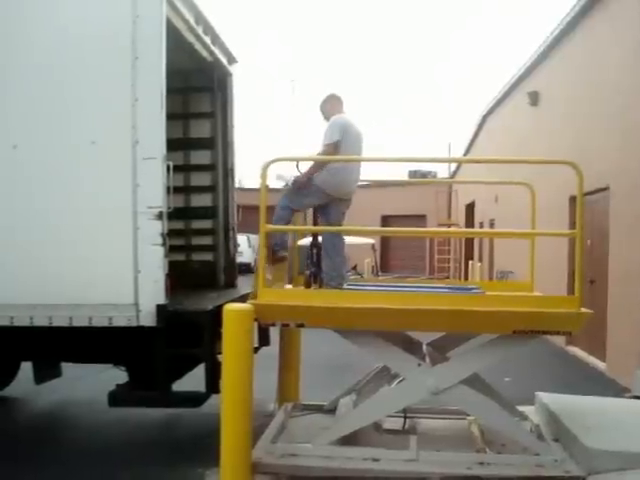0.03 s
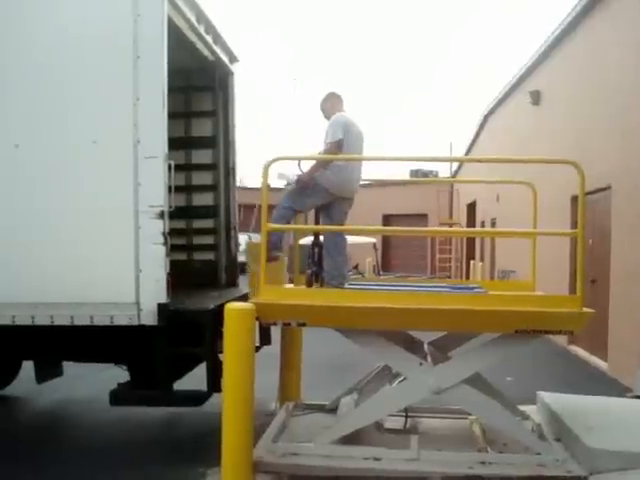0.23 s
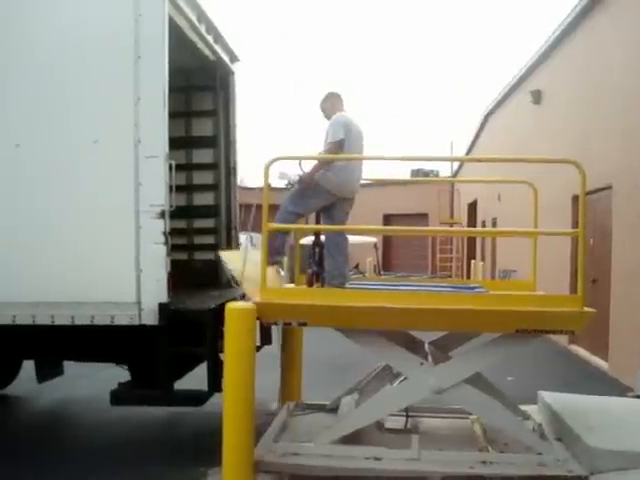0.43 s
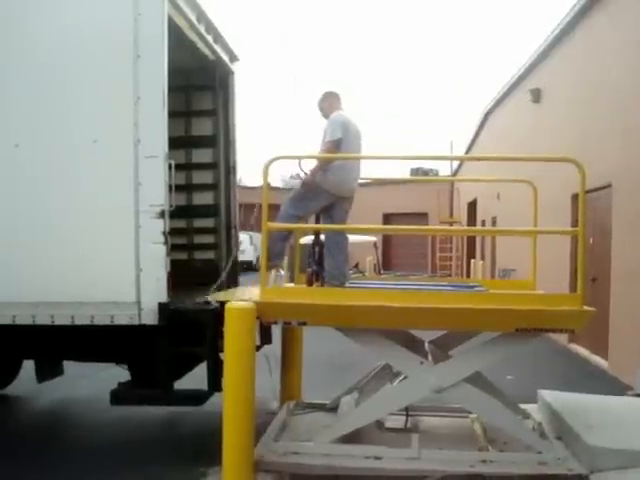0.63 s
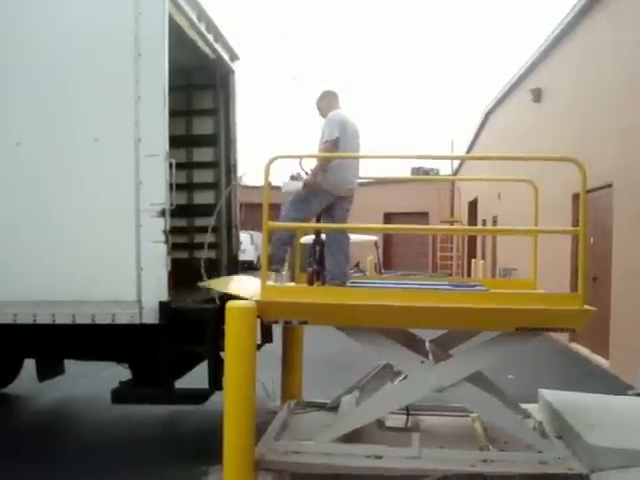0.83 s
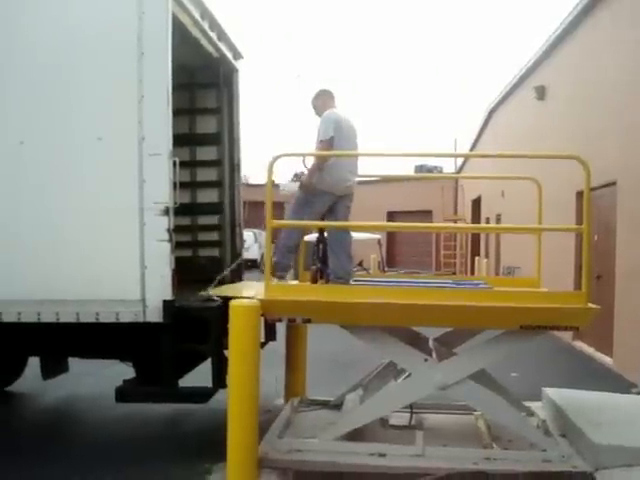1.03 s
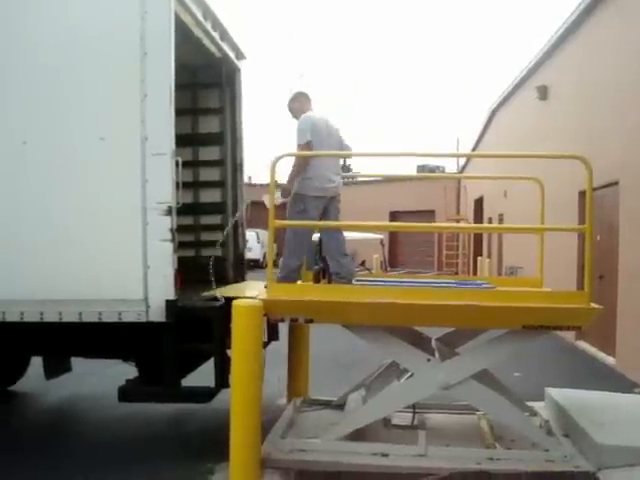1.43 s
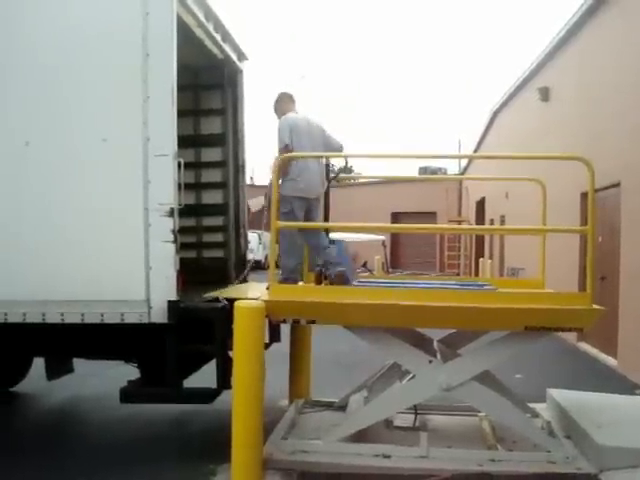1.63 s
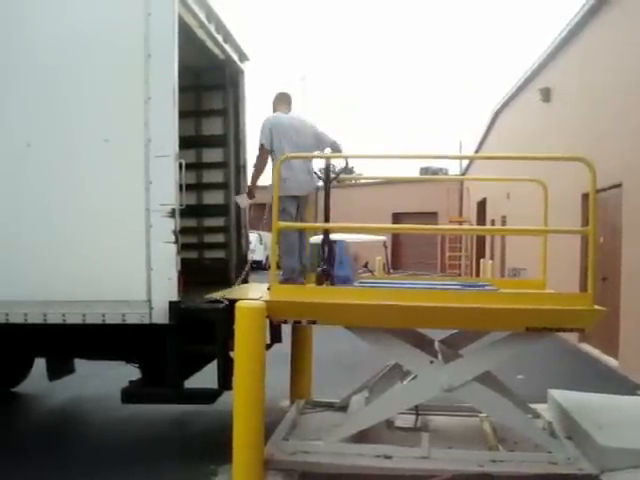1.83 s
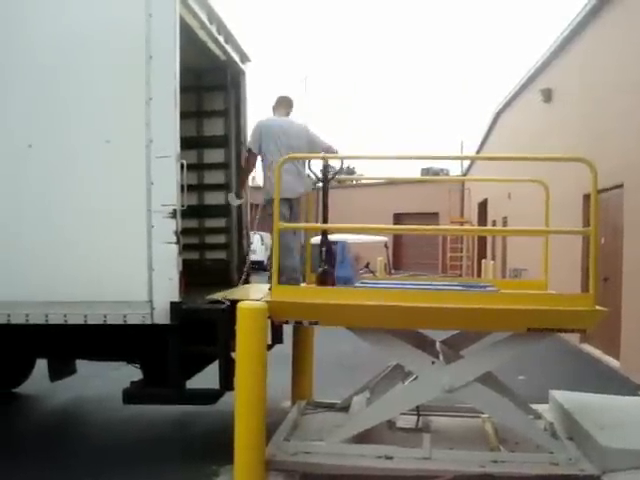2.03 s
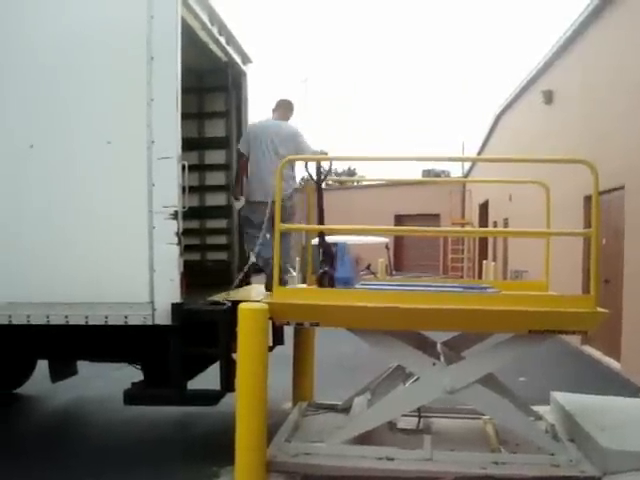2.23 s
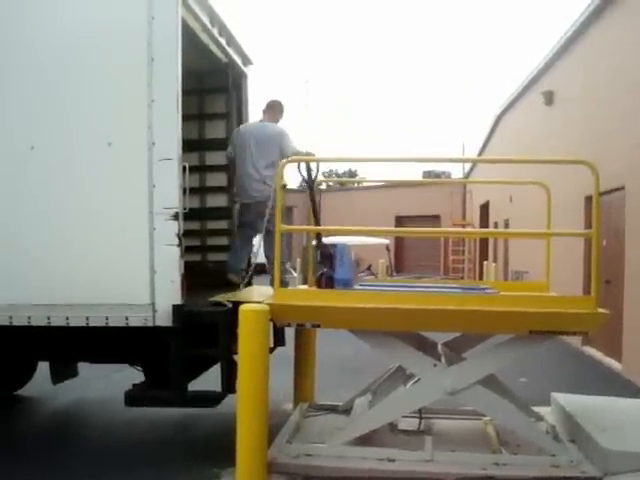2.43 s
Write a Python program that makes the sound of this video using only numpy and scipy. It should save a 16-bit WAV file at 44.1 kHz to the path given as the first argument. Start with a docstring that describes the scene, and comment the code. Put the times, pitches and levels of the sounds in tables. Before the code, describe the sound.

A heavy metal plate squeaks on its hinge, clangs down and rattles under boots.

```python
"""A loading yard outdoors, on a small camera microphone within earshot of a steel dock plate.
Over a steady distant roar comes one knock; the plate swings down on a dry hinge that squeaks, groans and
scrapes. At 0.8 s it crashes onto a truck bed and bounces; the camera's gain, a drawn curve, ducks the
roar. A soft, long rattle lingers, and from about 1.75 s boots and a pallet jack knock on the loose plate
while the gain slowly recovers. The truck box and the yard walls ring behind it all."""
import sys
import numpy as np
from scipy import signal
from scipy.fft import rfft, irfft
from scipy.io import wavfile

SR = 44100
rng = np.random.default_rng(int(sys.argv[2]) if len(sys.argv) > 2 else 0)


def to_wav(s):
    """Save 16-bit WAV."""
    ch = np.atleast_2d(s).T  # columns
    pcm = np.round(np.clip(ch, -1, 1) * 32767)  # PCM
    wavfile.write(sys.argv[1], SR, pcm.astype(np.int16))


N = 114660

# spectrum of the distant roar: f/Hz, level/dB
ROAR_COLOUR = [(25, -42.5), (241, -9.5), (604, -4), (829, -0.5), (1170, -11.5), (1800, -22.5), (3430, -39),
               (8410, -51), (9840, -48), (10700, -92)]
# the steady roar as the camera's automatic gain ducks it and slowly recovers: t/s, level/dB
DUCKED_LEVEL = [(0, -30), (.35, -26.5), (.8, -33), (1.4, -36.5), (1.75, -41.5), (2.2, -39.5), (2.6, -34)]
# echoes of truck box and walls: f/Hz, T60/s
YARD_T60 = [(200, 1.1), (1200, 1.04), (9000, 0.84)]
# frame and truck bed under the plate's weight: t/s, level/dB, decay/s
THUDS = [(.333, -28.5, 0.041), (.877, -45, 0.11)]
# rubbing of the hinge: t/s, level/dB, treble/dB
SCRAPE = [(.223, -29, 3.5), (.258, -33, 6.5), (.28, -21, 4.5), (.305, -26, -0.5), (.355, -22.5, -10),
          (.41, -23.5, -9), (.49, -26.5, -4.5), (.54, -22, 6), (.62, -19, 3.5), (.64, -24.5, 2),
          (.69, -18.5, -4.5), (.74, -32.5, 0), (.82, -25, -35)]
# its spectrum: f/Hz, level/dB
SCRAPE_COLOUR = [(60, -35), (200, -19), (400, -19.5), (1200, 5.5), (2600, 3.5), (4300, -2.5), (6000, -7),
                 (8000, -15.5), (13500, -31)]
# the hinge, and the lip sliding on the truck bed: t/s, length/s, f/Hz, level/dB
SQUEAKS = [(0.224, 0.022, 5804, -17), (0.256, 0.042, 5767, -26.5), (.826, 0.0093, 4330, -20),
           (0.827, 0.082, 2195, -20.5), (1.285, 0.041, 5810, -24), (1.338, .04, 5810, -31),
           (1.755, 0.0087, 1980, -33.5), (1.873, 0.011, 2163, -35), (2.515, 0.033, 4490, -58)]
# the two modes of a squeak: frequency ratio, level/dB
SQUEAK_MODES = [(0.999, 8), (1.026, -7)]
# groan of the hinge: t/s, f/Hz, level/dB
GROAN = [(.27, 751.7, -37), (.292, 753, -17), (.323, 738.2, -18.5), (.35, 750.7, -8), (.372, 747.2, -14),
         (.387, 740.3, -14.5), (.424, 719.3, -21.5), (.443, 712, -9.5), (.464, 723.8, -22),
         (.480, 710.4, -11.5), (.497, 697.7, -9), (.510, 729.4, -39), (.532, 727, -19), (.63, 735, -26)]
# its harmonics 2 to 5: level/dB
GROAN_OVERTONES_DB = [-18, -22.5, -25.5, -32]
# spectrum of the struck plate: f/Hz, level/dB
STEEL_COLOUR = [(50, -52), (150, -39), (280, -29.5), (430, -15.5), (620, -9.5), (1650, -1.17), (2600, -1.5),
                (4600, -9.5), (6000, -13.5), (9000, -26.5), (13500, -35)]
# its distinct modes: f/Hz, level/dB
PLATE_MODES = [(1047, -4), (1310, -3), (1603, -2), (1735, 2), (1950, 0), (2105, -4), (2236, -2), (2335, -3),
               (2430, -2), (2653, -4), (3200, -6)]
# the many close modes between them: f/Hz, T60/s
DENSE_T60 = [(150, 1), (600, 0.83), (2000, 0.59), (10000, 0.58)]
# one early knock, a soft, long rattle at 1.64 s, then boots and pallet jack on the plate:
# t/s, level/dB, bass/dB, treble/dB, chatter/s
KNOCKS_AND_RATTLE = [(.178, -34, 0, -30, 0.0041), (1.64, -32.5, -1.5, -7.5, 0.57),
                     (1.762, -23.5, -12.5, -17.5, 0.0043), (1.873, -25, -2.5, -10, 0.016),
                     (1.903, -41, 18, 1, 0.012), (2.035, -32, 6, -7, 0.025),
                     (2.298, -31.5, 15.5, -14, 0.021), (2.313, -41, 23, -2, 0.0032),
                     (2.504, -54, 1, 11, 0.0085)]
# plate on truck bed: t/s, level/dB, bass/dB, treble/dB, chatter/s
CLANGS = [(.823, -16.5, -4.5, 3.5, 0.018), (.873, -11, -2, -15.5, 0.0087), (.895, -17, 6.5, 3, 0.014),
          (.934, -19, 4, 4.5, 0.047), (1.05, -21, -17, -9.5, 0.11), (1.168, -15.5, 4, -2.5, 0.077),
          (1.222, -21, 2.5, 0.5, 0.051), (1.274, -20.5, -3.5, 3, 0.043), (1.315, -34, 15, 14.5, 0.009),
          (1.349, -20.5, 3, -6, 0.0077), (1.49, -28.5, 6.5, -9.5, .01)]
# microphone response: f/Hz, gain/dB
MIC = [(20, -7.5), (9600, 1.5), (10700, -9.5), (14000, -7.5)]

RING_S, SETTLE_S, MODE_T60_AT_1KHZ_S = 1.6, 0.0046, 0.7
CHATTER_PER_S, FIRST_CONTACT = 1500, 0.25
MODES_DB, MODE_SHIFT, SPOT_DB, SPOT_WIDTH_HZ = -10.5, 0.005, 3.6, 55
BASS_HZ, TREBLE_HZ = 1250, 4160


def amp(db):
    """Decibels to gain."""
    return 10 ** (np.asarray(db) / 20)


def unit(x):
    """Scales to rms 1."""
    return x / np.sqrt(np.mean(x ** 2) + 1e-20)


def read(points, hz):
    """Reads a table on a log-frequency axis."""
    f, value = np.transpose(points)
    return np.interp(np.log(hz + 1), np.log(f + 1), value)


def curve(points, column=1):
    """One column of a time table at every sample."""
    points = np.array(points)
    return np.interp(np.arange(N) / SR, points[:, 0], points[:, column])


def add(mix, start_s, sound):
    """Mixes a sound in at its time."""
    part = mix[max(round(start_s * SR), 0):][:len(sound)]
    part += sound[:len(part)]


def colour(x, db_at):
    """Minimum-phase filter with the gain db_at(Hz)."""
    hz = abs(np.fft.fftfreq(4096, 1 / SR))
    log_gain = np.log(amp(np.maximum(db_at(hz), -100)))
    impulse = np.fft.ifft(np.exp(np.conj(signal.hilbert(log_gain)))).real[:2048]
    return signal.fftconvolve(x, impulse)[:len(x)]


def waver(size, hz):
    """Smooth random motion below hz, at rms 1."""
    rolloff = 1 + (np.fft.rfftfreq(size, 1 / SR) / hz) ** 4
    return unit(irfft(rfft(rng.standard_normal(size)) / rolloff, size))


def dense_decay(t60s, damping=1):
    """Countless close modes or echoes, each band dying at its own speed."""
    size = round(RING_S * SR)
    hz, t, bands = signal.stft(rng.standard_normal(size), SR, nperseg=256)
    decay = amp(-60 * damping * t / read(t60s, hz)[:, None])
    return signal.istft(bands * decay, SR, nperseg=256)[1][:size]


def distant_roar(flutter_db=1.7):
    """A steady, dull background; a drawn curve stands for the camera's gain ducking after the crash."""
    roar = colour(rng.standard_normal(N + 2048), lambda hz: read(ROAR_COLOUR, hz))[2048:]
    return unit(roar) * amp(curve(DUCKED_LEVEL) + flutter_db * waver(N, 6.5))


def yard(x, wet_db, rise_s=0.0091):
    """The direct sound reaches the microphone first, then echoes off truck box and walls."""
    tail = dense_decay(YARD_T60)
    tail *= np.minimum(np.arange(len(tail)) / SR / rise_s, 1)
    return x + amp(wet_db) * signal.fftconvolve(x, tail / np.linalg.norm(tail))[:N]


def frame_thuds(cutoff_hz=287):
    """Frame and truck bed take the plate's weight with short, dull thuds."""
    out, t = np.zeros(N), np.arange(N // 4) / SR
    for start, level_db, decay_s in THUDS:
        rumble = unit(np.gradient(waver(len(t), cutoff_hz)))
        add(out, start, amp(level_db) * rumble * np.minimum(t / SETTLE_S, 1) * np.exp(-t / decay_s))
    return out


def hinge_scrape(slips_per_s=3000, ring_s=0.0095, spots=8, split_hz=3000):
    """Dense tiny slips of the rusty hinge, each briefly ringing one spot on the steel."""
    t = np.arange(N) / SR
    slips = rng.choice([-1, 1], N) * (rng.random(N) < slips_per_s / SR)
    spot = rng.integers(0, spots, N)
    rings = rng.standard_normal((spots, 2048)) * np.exp(-t[:2048] / ring_s)
    ringing = sum(signal.oaconvolve(slips * (spot == k), ring / np.linalg.norm(ring))[:N]
                  for k, ring in enumerate(rings))
    rub = unit(colour(slips + ringing, lambda hz: read(SCRAPE_COLOUR, hz)))
    dull = signal.sosfiltfilt(signal.butter(2, split_hz, fs=SR, output="sos"), rub)
    treble = (rub - dull) * amp(curve(SCRAPE, column=2))
    return (dull + treble) * amp(curve(SCRAPE)) * (t > SCRAPE[0][0]) * (t < SCRAPE[-1][0])


def squeaks(jitter=0.0074, flutter_db=3, fade_db=-5, edge_s=0.0013):
    """Short, thin squeals of steel on steel: two beating modes."""
    out, t = np.zeros(N), np.arange(N // 8) / SR
    for start, length, hz, level_db in SQUEAKS:
        tone = np.zeros(len(t))
        for ratio, db in SQUEAK_MODES:
            gain = amp(db + flutter_db * waver(len(t), 100))
            pitch = ratio * hz * (1 + jitter * waver(len(t), 330))
            tone += gain * np.sin(2 * np.pi * np.cumsum(pitch) / SR)
        gate = np.clip(np.minimum(t, length - t) / edge_s, 0, 1)
        add(out, start, unit(tone) * gate * amp(level_db + fade_db * np.minimum(t / length, 1)))
    return out


def hinge_groan(jitter=0.004, rasp=0.019, flutter_db=3.1, follow=0.72, fade_db_per_s=-16,
                low_hz=595, low_db=-21, stutter_db=11, stutter_s=0.043):
    """Uneven stick and slip: a tone, a weak lower mode, and overtones that fade as the plate tips."""
    t = np.arange(N) / SR
    since = np.maximum(t - GROAN[0][0], 0)
    stutter = np.sin(np.pi * np.maximum(t - GROAN[-2][0], 0) / stutter_s) ** 2  # only as it dies
    level_db = curve(GROAN, column=2) - stutter_db * stutter
    pitch = curve(GROAN) * (1 + jitter * waver(N, 75))
    phase = 2 * np.pi * (np.cumsum(pitch) / SR + rasp * waver(N, 300))
    low_mode = amp(low_db) * np.sin(2 * np.pi * low_hz * t)
    tone = amp(level_db + flutter_db * waver(N, 92)) * (np.sin(phase) + low_mode)
    overtones = sum(amp(db + flutter_db * waver(N, 92)) * np.sin(k * phase)
                    for k, db in enumerate(GROAN_OVERTONES_DB, 2))
    overtones *= amp(follow * level_db + fade_db_per_s * since)
    return np.sqrt(2) * (tone + overtones) * (since > 0) * (t < GROAN[-1][0])


def plate_modes(t, damping):
    """The plate's distinct tones, slightly detuned at each blow; the high ones die first."""
    out = np.zeros(len(t))
    for hz, db in PLATE_MODES:
        pitch = hz * (1 + MODE_SHIFT * rng.standard_normal())
        decay_db = 60 * damping * t * np.sqrt(hz / 1000) / MODE_T60_AT_1KHZ_S
        out += amp(db - decay_db) * np.sin(2 * np.pi * (pitch * t + rng.random()))
    return out


def plate_blow(level_db, bass_db, treble_db, chatter_s, damping, crack_db):
    """A first contact and a burst of chatter: the contacts crack and build up the plate's ring."""
    dense = dense_decay(DENSE_T60, damping)
    t = np.arange(len(dense)) / SR
    force = np.minimum(t / SETTLE_S, 1) * np.exp(-t / chatter_s)
    chatter = rng.choice([-1, 1], len(t)) * (rng.random(len(t)) < CHATTER_PER_S / SR) * force
    contacts = chatter / (np.linalg.norm(chatter) + 1e-9) + FIRST_CONTACT * (t == 0)
    build_up = np.sqrt(np.cumsum(contacts ** 2) / np.sum(contacts ** 2))
    spot = SPOT_DB * rng.uniform(-np.sqrt(3), np.sqrt(3), 512)  # each spot favours other resonances
    steel = lambda hz: read(STEEL_COLOUR, hz) + np.interp(hz / SPOT_WIDTH_HZ, np.arange(512), spot)
    body, crack = colour(dense * build_up, steel), colour(contacts, steel)
    modes = build_up * plate_modes(t, damping)
    parts = [(0, body), (MODES_DB, modes), (crack_db, crack)]
    sound = sum(amp(db) * part / part[:2600].std() for db, part in parts)  # balanced over the attack
    bass = lambda hz: bass_db / (1 + (hz / BASS_HZ) ** 3)
    treble = lambda hz: treble_db / (1 + (TREBLE_HZ / (hz + 1)) ** 3)
    return amp(level_db) * colour(sound, lambda hz: bass(hz) + treble(hz))


def dock_plate(blows, damping, crack_db, trim_db=-4.0):
    """The steel plate rings under a run of blows; more damping shortens the ring."""
    out = np.zeros(N)
    for start, *blow in blows:
        add(out, start, plate_blow(*blow, damping, crack_db))
    return amp(trim_db) * out


def scene():
    """Hinge, crash, rattle and footwork as they reach the microphone across the yard."""
    hinge = yard(hinge_groan() + frame_thuds(), wet_db=-13.0)
    hinge += yard(squeaks(), wet_db=-6.5) + yard(hinge_scrape(), wet_db=-11.5)
    clangs = yard(dock_plate(CLANGS, damping=0.98, crack_db=-4.5), wet_db=-9.5)
    loose_plate = yard(dock_plate(KNOCKS_AND_RATTLE, damping=1.75, crack_db=-5.5), wet_db=-5.5)
    return (distant_roar() + hinge + clangs + loose_plate)[None]


def record(dry, ceiling=0.9, edge_hz=13700):
    """A small mono camera microphone: rounded peaks, a dull top and a band limit."""
    rounded = dry[0] / (1 + (dry[0] / ceiling) ** 4) ** (1 / 4)
    heard = colour(rounded, lambda hz: read(MIC, hz))
    band_limit = signal.firwin(511, edge_hz, window=("kaiser", 9), fs=SR)
    return signal.oaconvolve(heard, band_limit, "same")[None]


dry = scene()
out = record(dry)
to_wav(out)
```